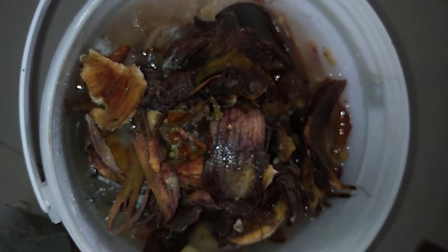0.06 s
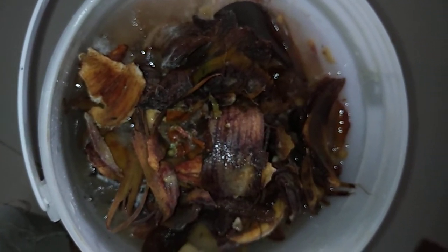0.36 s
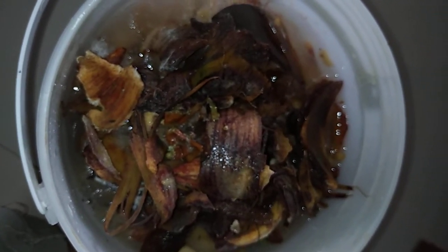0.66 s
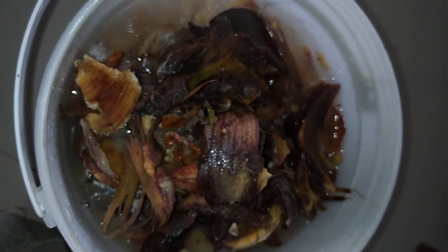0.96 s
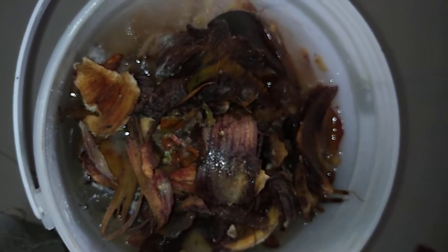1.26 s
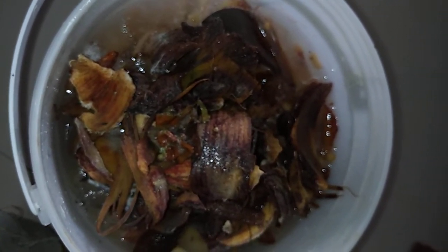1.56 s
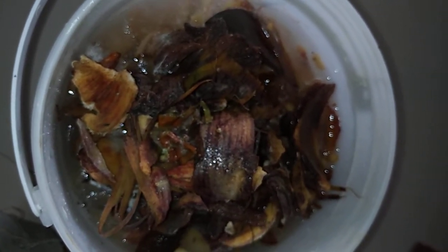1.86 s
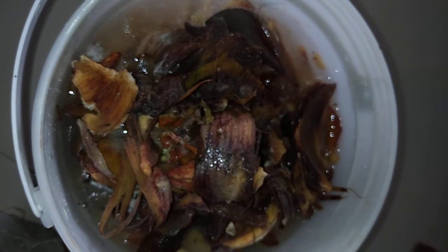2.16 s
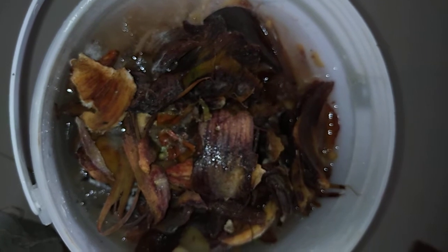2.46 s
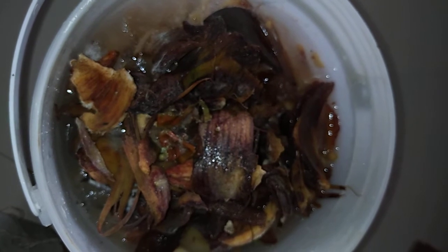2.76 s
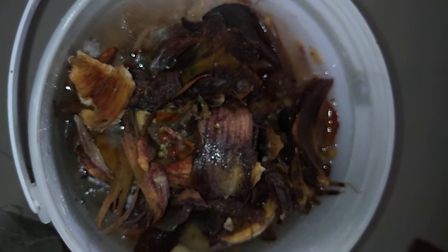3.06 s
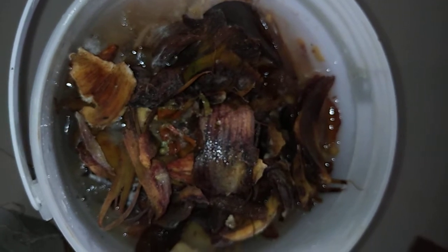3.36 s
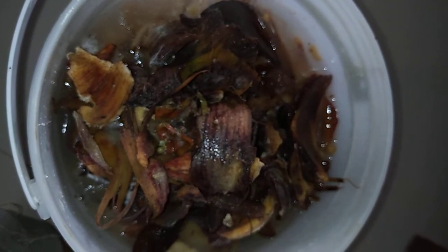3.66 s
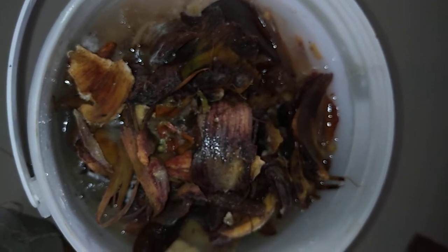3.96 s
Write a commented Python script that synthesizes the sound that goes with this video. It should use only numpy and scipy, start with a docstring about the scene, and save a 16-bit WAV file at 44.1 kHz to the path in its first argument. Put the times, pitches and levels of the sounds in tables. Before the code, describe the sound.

A motor vehicle's engine rumbles low, eases off, then picks up and passes with a swell of road roar and hiss. Close to the microphone are a few soft rustles and two faint ticks, in still outdoor air.

```python
"""The engine of an unseen motor vehicle eases off, labours slowly, then picks up and booms past.
Its periodic exhaust pulses form a harmonic series, whose members are called orders; a pipe resonance
lifts the overtone passing through it. A dull road roar and a bright hiss, both shaped noise, swell with
it over a deep drone and still outdoor air. Close by are a few soft rustles and two faint ticks."""
import sys
import numpy as np
from scipy import signal
from scipy.fft import rfft, irfft
from scipy.io import wavfile
from scipy.ndimage import uniform_filter1d

SR = 44100
rng = np.random.default_rng(int(sys.argv[2]) if len(sys.argv) > 2 else 0)


def transcribe(u):
    """Save the signal u as a 16-bit wav file named by the first command-line argument.

    u: samples, shape (n,) or (channels, n), limited to [-1, 1]; the rate is SR.
    q: integer samples, one column per channel.
    """
    v = np.clip(np.atleast_2d(u).T, -1, 1)
    q = np.round(v * 32767).astype(np.int16)
    wavfile.write(sys.argv[1], SR, q)


N = 176400
T = np.arange(N) / SR


def amp(db):
    """Amplitude grows tenfold for every 20 dB."""
    return 10 ** (np.asarray(db) / 20)


def unit(x):
    """Normalisation to an rms of 1."""
    return x / np.sqrt(np.mean(x ** 2) + 1e-20)


def curve(rows, column=1):
    """Linear interpolation of one column of a time table, at every sample."""
    rows = np.array(rows, float)
    return np.interp(T, rows[:, 0], rows[:, column])


def colour(points, hz):
    """Interpolation of a table on a logarithmic frequency axis."""
    f, value = np.transpose(points)
    return np.interp(np.log(hz + 1), np.log(f), value)


def drift(hz):
    """Low-pass noise: a random fluctuation of rms near 1, up to about hz."""
    count, rate = 1600, 200
    f = np.fft.rfftfreq(count, 1 / rate)
    slow = irfft(rfft(rng.standard_normal(count)) * np.exp(-(f / hz) ** 2))
    return np.interp(T, np.arange(count) / rate, unit(slow))


# Engine speed. Each row: time in seconds, cycles per second.
CYCLE_RATE = [(0, 25.3), (.32, 25.2), (.6, 24.2), (.9, 23.1), (1.18, 22.6), (1.5, 22.75), (1.85, 23.0),
              (2.07, 23.4), (2.27, 25.25), (2.7, 25.9), (3.0, 26.15), (3.5, 26.4), (4, 26.6)]
# Exhaust boom. Each row: time in seconds, levels in dB of orders 4, 6, 7 and 8.
BOOM_DB = [(0, -78, -59, -84, -75), (.3, -73, -73, -64, -68.5), (.7, -65, -69, -78, -68),
           (.95, -66.5, -61.5, -60.5, -68), (1.17, -59, -82, -55.5, -60.5),
           (1.48, -56, -63.5, -68.5, -60.5), (1.85, -62.5, -60.5, -52.5, -59),
           (1.98, -61.5, -76, -62, -65.5), (2.1, -51, -81, -55.5, -55), (2.25, -59.5, -60.5, -53.5, -69),
           (2.39, -73, -54, -43.5, -82), (2.53, -64, -59.5, -47, -65), (2.73, -65, -52.5, -41.5, -62.5),
           (2.92, -62, -49, -49, -61), (3.27, -63.5, -52.5, -54.5, -99), (3.55, -70, -46.5, -59, -72),
           (3.75, -64, -54, -58, -73), (4, -76, -55, -67.5, -72)]
# The other orders below the first overtone. Each row: time in seconds, base level in dB.
LOW_ORDER_DB = [(0, -62), (.55, -59.5), (.9, -65.5), (1.4, -69), (1.9, -68), (2.1, -64), (2.35, -53),
                (2.85, -54), (3.1, -54), (3.4, -60.5), (3.75, -56.5), (4, -75)]
# The overtones. Each row: time in seconds, base level in dB.
HIGH_ORDER_DB = [(0, -69), (.3, -66.5), (.7, -68), (1.0, -67), (1.35, -69.5), (1.8, -70.5), (2.05, -65.5),
                 (2.35, -58.5), (2.85, -58.5), (3.15, -61), (3.5, -62), (4, -67.5)]
# Engine timbre. Each row: order, then dB added to its base level in each of the five stages.
ORDER_TIMBRE = [(1, -22, -12, -18, -20, -8), (2, -2.5, -12, -8, -23, -11), (3, -24, -13, -14, -9, -8),
                (5, -6, -8, -2, -4.5, -8.5), (9, -13, 3, -18, -19, -21), (10, -35, -11, -20, -14.5, -8.5),
                (11, -11.5, -10.5, -8.5, -4.5, -2), (12, -2, -8.5, -12.5, -7.5, -7.5),
                (13, -10.5, -6, -2.5, -8, -6), (14, -17, -11.5, -9, -14.5, -14),
                (15, -26, -13, -16, -23, -20), (16, -15, -11, -16, -23, -31), (17, -23, -15, -25, -22, -28),
                (18, -13.5, -15, -20, -9, -16), (19, -10.5, -29, -17, -13, -15.5),
                (20, -23, -16.5, -22, -17, -26), (21, -25, -11.5, -26, -27, -33),
                (22, -23, -17, -23, -25, -35)]
# Each row: time in seconds, stage (0 or less coasting, 1 labouring, 2 picking up, 3 pulling, 4 cruising).
DRIVE_STAGE = [(0, 0), (.6, -0.5), (1.0, 1.5), (1.95, 1), (2.25, 2), (2.48, 1), (2.72, 3), (3.05, 3),
               (3.45, 4), (4, 4)]
# Pipe resonance. Each row: time in seconds, gain at its centre in dB.
RESONANCE_DB = [(0, -2), (1.42, -1), (1.6, 12), (1.88, 13.5), (2.02, 0.5), (2.68, -5), (2.86, 12),
                (3.12, 11), (3.33, -1), (4, 7)]
BOOM_ORDERS, FIRST_OVERTONE = (4, 6, 7, 8), 9
RESONANCE_HZ, HALF_WIDTH_HZ = 367, 10
WAVER_DB, WAVER_HZ = 1.5, 4.3  # flutter of each order outside the boom
DISPERSION = .14  # the pipe smears each pulse, in radians per order squared
SCATTER, SIDE_SPREAD, WANDER, WANDER_HZ = .7, .2, .2, 6  # the first three in radians at the first overtone
LEFT_LEAD_S, PAN_DB = .0001, .44  # the pan raises the left and lowers the right


def engine(cycles):
    """Fourier synthesis: exhaust pulses are a sum of orders, whole multiples of the cycle rate."""
    stage, speed = curve(DRIVE_STAGE), curve(CYCLE_RATE)
    orders = [(k, curve(BOOM_DB, column=i + 1)) for i, k in enumerate(BOOM_ORDERS)]
    for k, *stage_db in ORDER_TIMBRE:
        base_db = curve(LOW_ORDER_DB if k < FIRST_OVERTONE else HIGH_ORDER_DB)
        timbre_db = np.interp(stage, np.arange(len(stage_db)), stage_db)
        detuning = (k * speed - RESONANCE_HZ) / HALF_WIDTH_HZ
        lift_db = curve(RESONANCE_DB) / (1 + detuning ** 2)
        orders.append((k, base_db + timbre_db + lift_db + WAVER_DB * drift(WAVER_HZ)))
    out, sides = np.zeros((2, N)), np.array([[1], [-1]])
    for k, db in orders:
        scatter, spread = rng.standard_normal(2)
        diffusion = (k / FIRST_OVERTONE) ** 2  # shifting reflections scramble the high orders most
        side_phase = spread * SIDE_SPREAD * diffusion + 2 * np.pi * LEFT_LEAD_S * k * speed
        phase = diffusion * (SCATTER * scatter + WANDER * drift(WANDER_HZ)) - DISPERSION * k ** 2
        out += amp(db) * np.sqrt(2) * np.cos(2 * np.pi * k * cycles + phase + sides * side_phase / 2)
    return out * amp(sides * PAN_DB)


# A deep tone beside the engine. Each row: time in seconds, frequency in Hz, level in dB.
DRONE_TONE = [(0, 34.93, -65), (.55, 36.5, -59.5), (.95, 37.8, -69), (1.3, 39.1, -64), (1.8, 39.3, -66),
              (2.3, 40.1, -72), (2.9, 41.06, -65), (3.55, 41.5, -61), (4, 41.76, -68)]


def drone():
    """A pure tone creeping upward: its phase is the integral of its frequency."""
    phase = 2 * np.pi * np.cumsum(curve(DRONE_TONE)) / SR
    return np.sqrt(2) * amp(curve(DRONE_TONE, column=2)) * np.sin(phase)


# Likeness of the two sides. Each row: frequency in Hz, correlation from 0 to 1.
CORRELATION = [(30, 0.43), (150, 0.94), (300, 1), (550, 0.25), (1000, 0.15), (2000, 0), (14000, 0.03)]
# Balance of the noise. Each row: frequency in Hz, left minus right in dB.
BALANCE_DB = [(100, 2), (350, 1.5), (700, 0.4), (1300, -1), (5500, 0.2), (7500, -1.5), (9000, 3),
              (13000, 1.5)]
PATCH_DB, FLICKER_DB = 1.53, .5


def noise(spectrum, size=1024):
    """Spectral shaping: partly correlated stereo noise of rms 1, with drifting patches and a flicker."""
    hz, frames = np.fft.rfftfreq(size, 1 / SR), N // (size // 4) + 5
    a, b, c, d, patches = rng.standard_normal((5, frames, len(hz)))
    patches = uniform_filter1d(patches, size=12, axis=0)
    patches = unit(uniform_filter1d(patches, size=14, axis=1))
    correlation, lean = colour(CORRELATION, hz), amp(colour(BALANCE_DB, hz) / 2)
    left = a + 1j * b
    right = correlation * left + np.sqrt(1 - correlation ** 2) * (c + 1j * d)
    gain = amp(colour(spectrum, hz) + PATCH_DB * patches + FLICKER_DB * rng.standard_normal((frames, 1)))
    spectra = np.array([left * lean, right / lean]) * gain
    _, sound = signal.istft(spectra.transpose(0, 2, 1), nperseg=size, noverlap=size * 3 // 4)
    return unit(sound[:, :N])


# Colour of the road roar. Each row: frequency in Hz, relative spectral density in dB.
ROAR_SPECTRUM = [(20, -6.5), (100, -1), (300, -2.5), (410, -9.5), (490, -8), (620, -16.5), (780, -15),
                 (920, -13.5), (1120, -18), (1400, -25.5), (2000, -28), (2700, -22.5), (3500, -27.5),
                 (6000, -27), (14000, -60)]
# Swell of the roar. Each row: time in seconds, level in dB.
ROAR_SWELL = [(0, -70), (.7, -71.5), (1.3, -74.5), (1.9, -69.5), (2.35, -62.5), (2.85, -59), (3.3, -65),
              (3.7, -67), (4, -64.5)]


def road_roar(cycles, depth=.1):
    """Amplitude modulation: dull noise throbs once in each engine cycle."""
    throb = 1 + depth * np.cos(2 * np.pi * cycles)
    return noise(ROAR_SPECTRUM) * amp(curve(ROAR_SWELL)) * throb


# Colour of the hiss. Each row: frequency in Hz, relative spectral density in dB.
HISS_SPECTRUM = [(500, -37), (1500, -8), (2700, -6), (3500, -13), (4700, -5), (5400, -9), (7000, -2),
                 (8400, 1.5), (9800, -1.5), (11500, -8), (14000, -12.5)]
# Swell of the hiss. Each row: time in seconds, level in dB.
HISS_SWELL = [(0, -79), (.3, -75), (.85, -81.5), (1.5, -76.5), (2.0, -73), (2.25, -66), (2.55, -63),
              (2.85, -64), (3.1, -65.5), (3.4, -67), (3.7, -72.5), (4, -75)]


def hiss():
    """Bright broadband noise under a slow envelope, which swells as the vehicle passes."""
    return noise(HISS_SPECTRUM) * amp(curve(HISS_SWELL))


# Colour of the outdoor air. Each row: frequency in Hz, relative spectral density in dB.
AIR_SPECTRUM = [(20, -10), (60, -1.5), (150, -2.5), (300, -7.5), (410, -11.5), (490, -9), (620, -14.5),
                (800, -15.5), (1100, -20), (1380, -28), (1800, -24.5), (2700, -24.5), (3400, -28.5),
                (4600, -25.5), (5500, -27), (8000, -20.5), (9800, -23.5), (11500, -33.5), (14000, -33)]


def still_air(db=-65.5):
    """The ambient noise floor: steady, and strongest in the bass."""
    return amp(db) * noise(AIR_SPECTRUM)


def band(hz, octaves):
    """Band-pass filtering: stereo noise under a Gaussian curve in log frequency."""
    f = np.fft.rfftfreq(N, 1 / SR) + 1
    response = np.exp(-.5 * (np.log2(f / hz) / octaves) ** 2)
    return unit(irfft(rfft(rng.standard_normal((2, N))) * response, N))


# Rustles. Each row: middle and length in seconds, level in dB, centre in Hz, width in octaves.
RUSTLE_EVENTS = [(.325, .07, -73.5, 3700, .28), (.66, .075, -71.5, 8800, .3), (1.75, .05, -78.5, 10000, .4),
                 (1.965, .07, -76, 3450, .36)]


def rustles(crackle_db=1, crackle_hz=70):
    """Random amplitude modulation roughens noise bands that swell and fade in a Gaussian envelope."""
    out = np.zeros((2, N))
    for middle, length, db, hz, octaves in RUSTLE_EVENTS:
        grain = unit(amp(crackle_db * drift(crackle_hz)))
        envelope = np.exp(-2 * ((T - middle) / length) ** 2)
        out += amp(db) * band(hz, octaves) * grain * envelope
    return out


# Ticks. Each row: start in seconds, level in dB, centre in Hz, width in octaves,
# time to fall 60 dB in seconds, level of the knock in dB.
TICK_EVENTS = [(1.404, -68, 2200, .3, .06, -82), (1.482, -68.5, 4100, .28, .09, -63.5)]


def ticks(knock_t60_s=.058):
    """Exponential decay after a sudden onset: each dry tick dies away over a dull knock."""
    out = np.zeros((2, N))
    for start, db, hz, octaves, t60, knock_db in TICK_EVENTS:
        fall = -np.log(1000) * abs(T - start)
        knock = amp(knock_db) * band(hz=640, octaves=1.1) * np.exp(fall / knock_t60_s)
        tick = amp(db) * band(hz, octaves) * np.exp(fall / t60)
        out += (T >= start) * (tick + knock)
    return out


def scene():
    """Superposition of all sources; one slightly unsteady cycle rate drives the engine and the throb."""
    jitter = .0014 * drift(hz=15.2)
    cycles = np.cumsum(curve(CYCLE_RATE) * (1 + jitter)) / SR
    return engine(cycles) + drone() + road_roar(cycles) + hiss() + still_air() + ticks() + rustles()


def record(dry, cutoff_hz=14250):
    """Band limiting: a steep low-pass filter removes the highest treble."""
    lowpass = signal.firwin(2047, cutoff_hz, window=("kaiser", 9), fs=SR)
    return signal.oaconvolve(dry, lowpass[None], "same")


dry = scene()
out = record(dry)
transcribe(out)
```